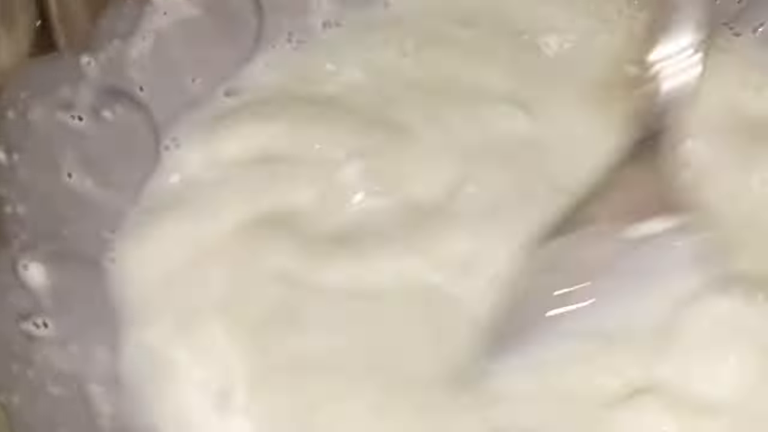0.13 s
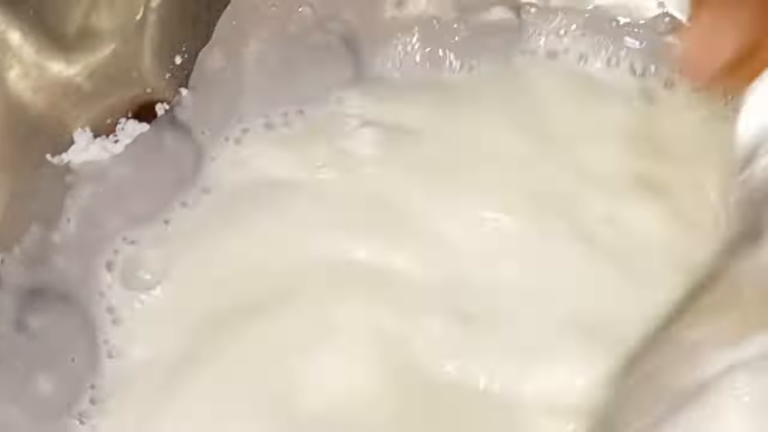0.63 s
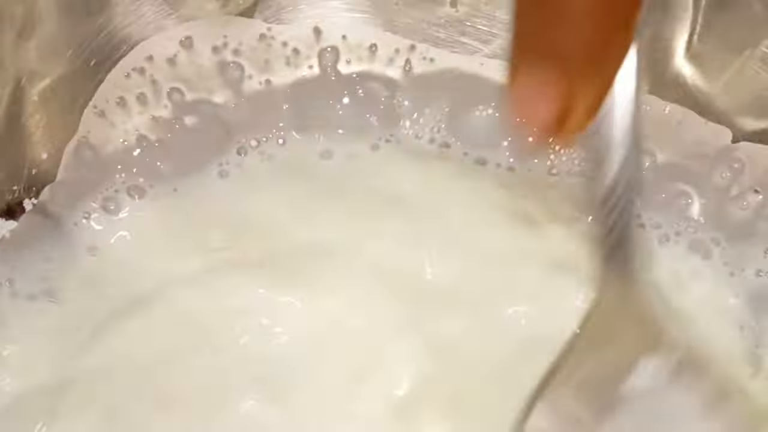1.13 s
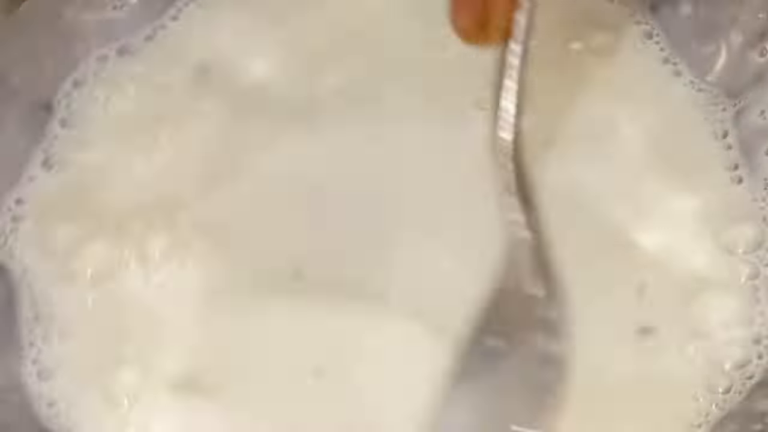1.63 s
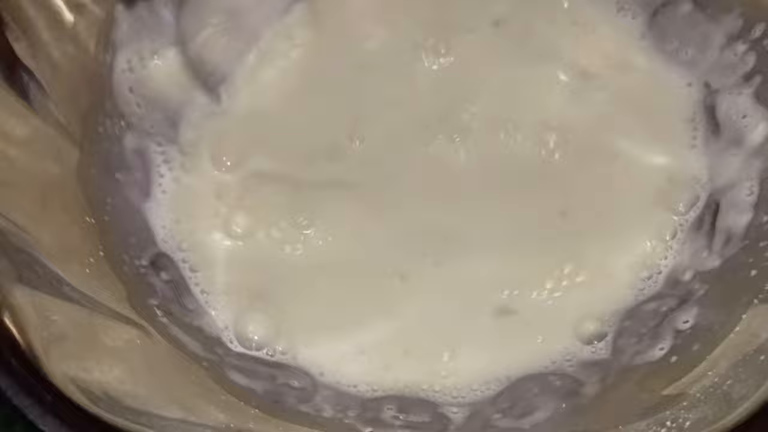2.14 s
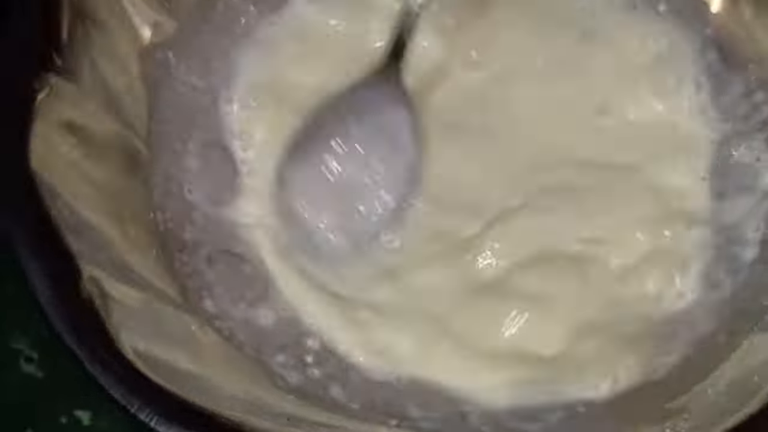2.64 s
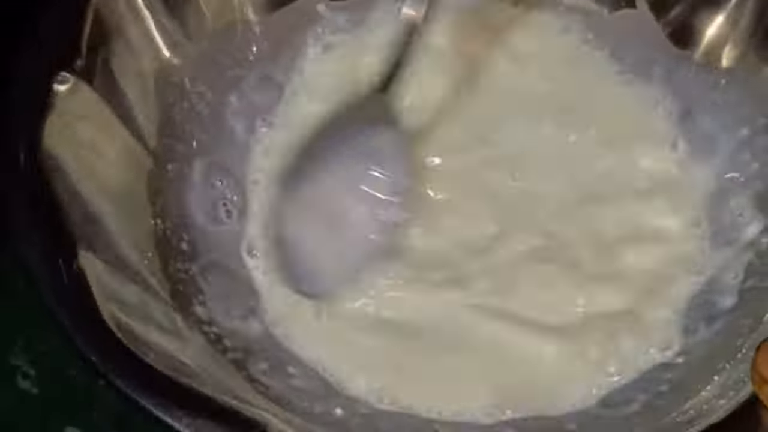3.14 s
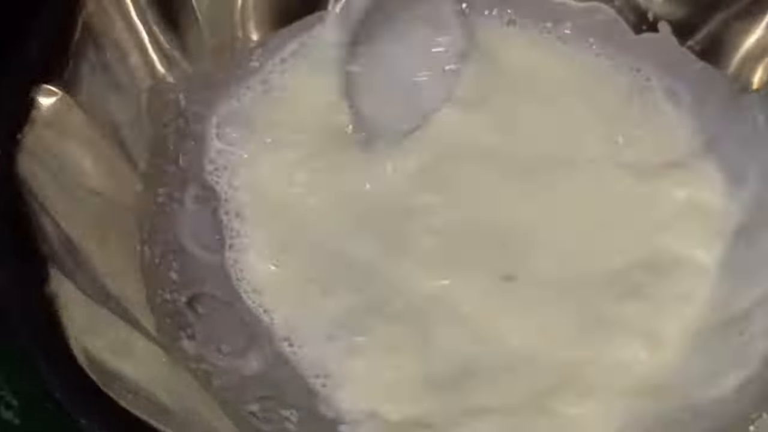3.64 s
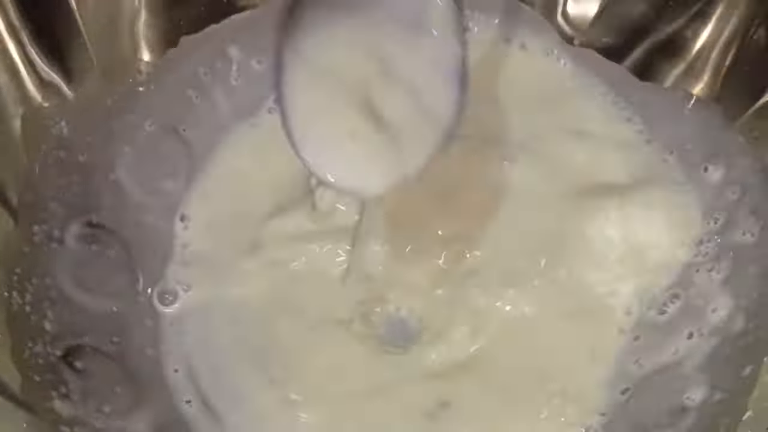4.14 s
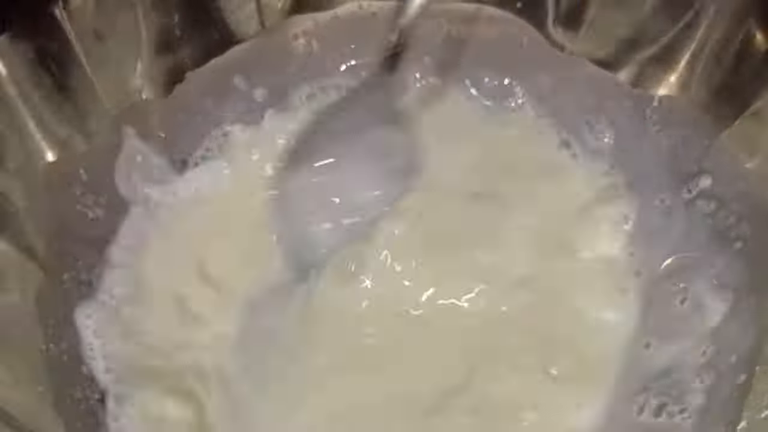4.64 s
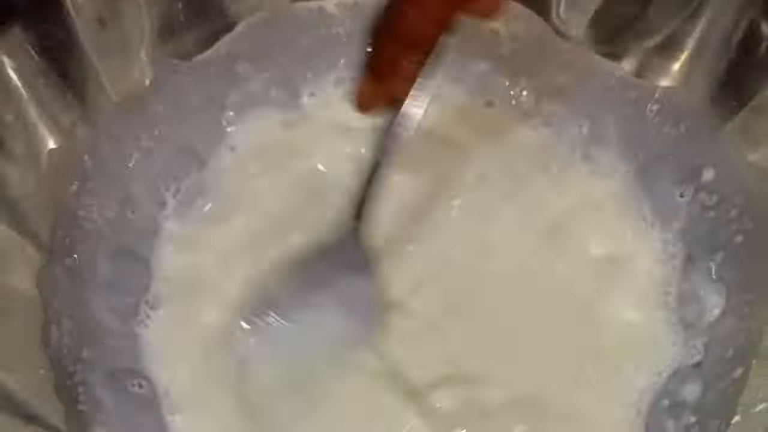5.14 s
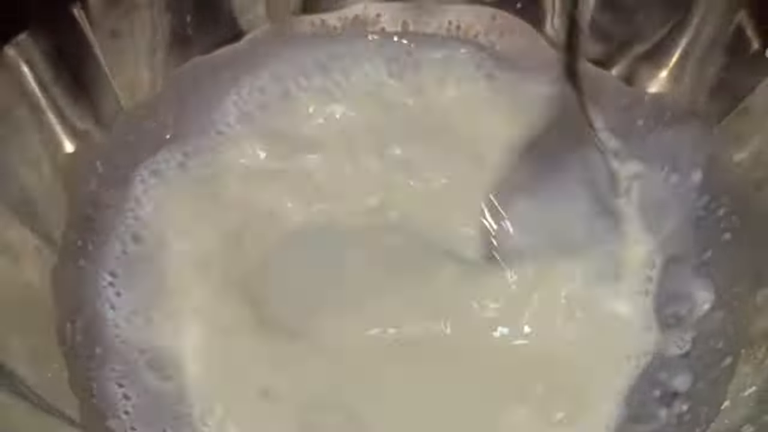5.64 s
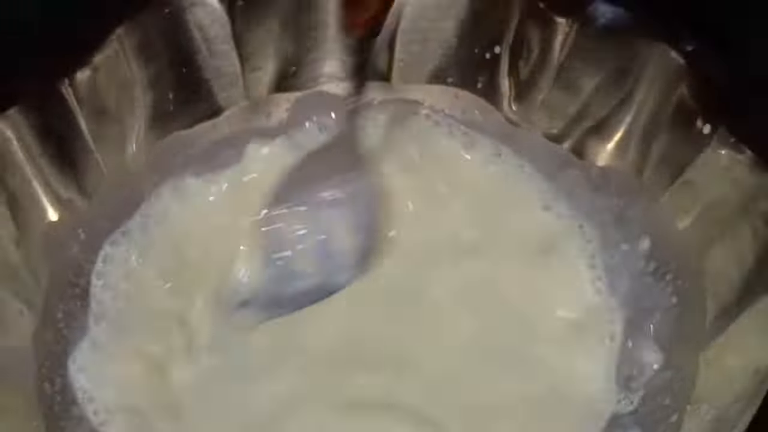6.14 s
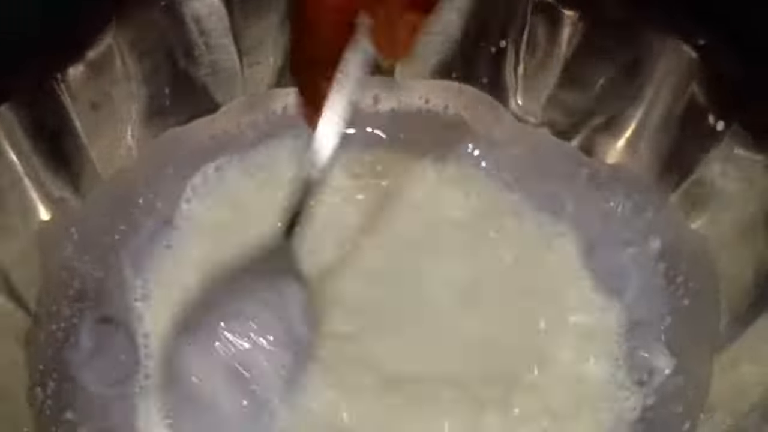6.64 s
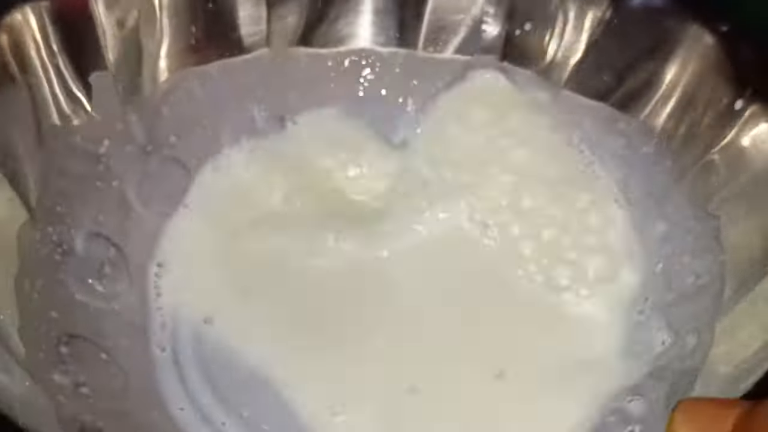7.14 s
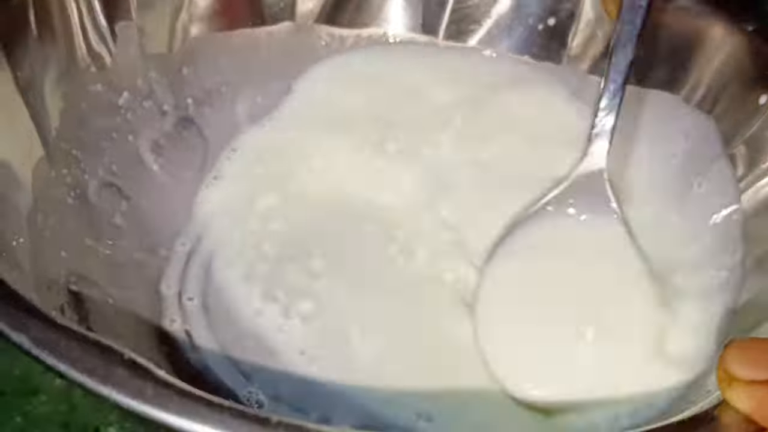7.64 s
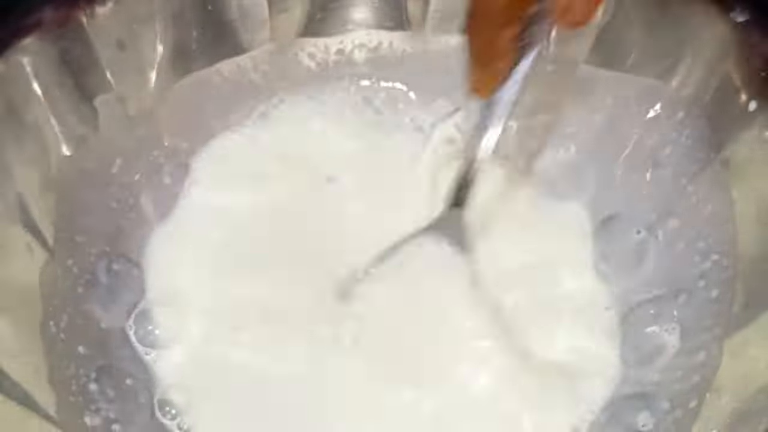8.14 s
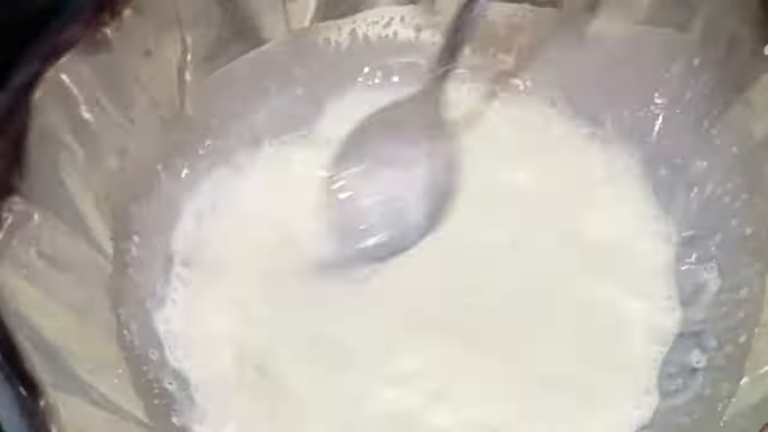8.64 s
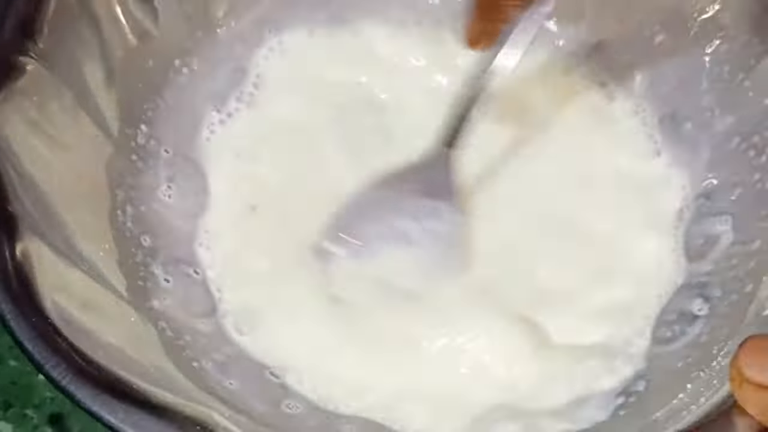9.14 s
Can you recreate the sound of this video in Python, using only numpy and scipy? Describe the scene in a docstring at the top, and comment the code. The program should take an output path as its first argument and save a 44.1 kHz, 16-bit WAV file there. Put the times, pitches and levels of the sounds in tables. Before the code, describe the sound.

Rapid jerky stirring of runny batter in a steel bowl: gritty rubbing, bright spoon knocks, dull bowl bumps, short gaps, quiet kitchen behind.

```python
"""On a kitchen counter a spoon stirs batter in a fluted steel bowl, heard close, in fast motion.
Only short snatches of the stirring are kept and butted together with cross-fades. In each, lumpy noise
with grains and blows excites the resonances of the wall: a thud, a ring, a rub and a wet-edge hiss.
Short decaying sines add slaps of batter, knocks of the spoon and shoves of the bowl on the counter.
Flutes of the wall make brief level jumps, and a faint noise floor fills the room."""
import sys
import numpy as np
from scipy import signal
from scipy.fft import rfft, irfft, next_fast_len
from scipy.io import wavfile
from scipy.ndimage import uniform_filter1d

SR = 44100
rng = np.random.default_rng(int(sys.argv[2]) if len(sys.argv) > 2 else 0)


def ratio_of_db(decibels):
    """Turn decibels (scalar or array-like) into linear amplitude factors; 0 dB maps to 1."""
    return 10 ** (np.asarray(decibels, float) / 20)


def dump(signal):
    """Clip the signal to [-1, 1] and save it as 16-bit WAV at the path in sys.argv[1]."""
    limited = np.clip(np.atleast_2d(signal).T, -1, 1)
    pcm = np.round(limited * 32767).astype(np.int16)
    wavfile.write(sys.argv[1], SR, pcm)


N = 408718
SIZE = 8192  # transform length [samples]
SNATCH_S, SHORTEST_S = .04199, .007  # pace of the steady cuts, least distance between cuts [s]

# resonances of bowl, spoon and counter, before scatter: (frequency [Hz], half-width [Hz],
# level over the broad colour [dB], gain per dB of wall ring [dB/dB])
BOWL_MODES = [(132.9, 21.7, 9, -2), (226, 42, 6.5, 0.2), (310.7, 21.5, 11.5, -0.6), (493, 68, 3.5, 0.54),
              (678.3, 16, 11.5, 0.6), (893.5, 61, 10.5, -0.12), (1210, 140, 1.5, 0.15),
              (1390, 33, 17, 0.53), (1493, 69, 13, 0.16), (2034, 250, 5.5, 0.18), (2703, 91, 6.5, 0.5),
              (3147, 83, 9.5, 0), (3660, 67, 7, 0.25), (5053, 81, 1.5, 1), (7074, 51, 6.5, 1.5),
              (8240, 81, 8, 0), (14340, 2700, 7, 0)]
# borders of the four bands thud | ring | rub | hiss: (frequency [Hz])
BAND_EDGES_HZ = (450, 1800, 5000)
# stereo balance over frequency: (frequency [Hz], left over right [dB])
STEREO_LEAN = [(60, 3), (130, 7.5), (290, 0), (640, 6), (1410, 1), (3100, -2), (6820, -1.5), (15000, -1)]
# blows of the spoon on the wall, each at the start of a snatch: (time [s], pitch of the struck patch [Hz],
# sharpness [dB], fall before rub sag and band share [dB/s])
KNOCKS_ON_WALL = [(0.376, 1370, 15, 327), (0.504, 1400, -2, 200), (1.175, 865, 17, 122),
                  (1.312, 906, 7, 100), (1.44, 319.9, -19, 350), (1.51, 1484, 5, 282),
                  (1.829, 1210, 11, 200), (1.865, 1210, 23, 200), (2.006, 1280, 13, 900),
                  (2.038, 1210, 15, 500), (2.086, 1199, 14, 600), (2.141, 1500, 15, 300),
                  (2.267, 1430, 5, 250), (2.649, 3214, 29, 398), (2.682, 2610, 10, 190),
                  (2.865, 1782, -7, 250), (3.015, 955, 3, 248), (3.323, 2830, 20, 196),
                  (3.797, 1374, -8, 190), (4.072, 1454, 10, 330), (4.314, 1500, -1, -6),
                  (4.453, 1510, 9, 120), (4.535, 1420, -5, 124), (6.888, 3547, 24, 250),
                  (6.927, 1500, 9, 150), (6.97, 1527, 6, 301.5), (7.008, 1508, 0, 100),
                  (7.427, 1020, 20, 301), (7.436, 716.9, 4, 245), (7.52, 2699, -5, -2),
                  (7.724, 1421, 0, 197), (7.793, 1390, 5, 206), (8.348, 1373, 15.5, 192)]
# spoon in touch with the steel, before scatter: (start [s], length [s], rub level [dB],
# wall ring over rub [dB], wet-edge hiss over rub [dB])
SPOON_CONTACTS = [(0.0, 0.039, -31.5, -0.5, -7.5), (0.046, 0.042, -34, -9, -2.5),
                  (0.082, 0.042, -43, -7, -3), (0.114, 0.075, -37, -3.5, -4.5),
                  (0.193, 0.051, -38.5, -6, -4), (0.248, 0.064, -36.5, 0.5, -6),
                  (0.313, 0.059, -37.5, -3, -0.5), (0.375, 0.042, -21.5, 1, -12),
                  (0.417, 0.045, -40.5, -5, -14), (0.464, 0.081, -37, -3, -2),
                  (0.539, 0.042, -41.5, 4, -3.5), (0.627, 0.044, -40.5, -3.5, -3),
                  (0.675, 0.082, -45, 0, -2), (0.75, 0.042, -35.5, -1.5, 0.5),
                  (0.789, 0.084, -40.5, 0, -3.5), (0.878, 0.042, -29, -5.5, -6),
                  (0.924, 0.042, -43, 1, -6.0), (0.966, 0.042, -38, -8, -3),
                  (1.01, 0.042, -33.5, -5.5, -2.5), (1.087, 0.084, -39, -8, -1.5),
                  (1.172, 0.043, -33, 5, -9.5), (1.219, 0.094, -31.5, -5.5, -3.5),
                  (1.309, 0.032, -38, 12, -9), (1.342, 0.042, -31, -4, -3), (1.38, 0.042, -37.5, -9.5, -4),
                  (1.423, 0.017, -28.5, -4, -6.5), (1.437, 0.028, -30.5, 4, -8.5),
                  (1.506, 0.044, -34.5, 14.5, -5.5), (1.547, 0.042, -43, 3, -2), (1.593, 0.043, -48, 5, 1),
                  (1.639, 0.042, -52, 1, -12), (1.676, 0.042, -49.5, 13, -13),
                  (1.712, 0.084, -41.5, -3.5, -7.5), (1.8, 0.022, -50.5, 1, -10),
                  (1.827, 0.024, -35, 18, -10), (1.847, 0.013, -40, -4, -5), (1.862, 0.025, -26, 1.5, -10),
                  (1.888, 0.045, -40, 0.5, -2.5), (2.003, 0.013, -23, 9.5, -12.5),
                  (2.015, 0.02, -45, 5.5, -2), (2.036, 0.018, -28, 2, -6), (2.054, 0.03, -36.5, -3.0, -4),
                  (2.085, 0.017, -15.5, 6.5, -9), (2.099, 0.038, -39, -1, -15.5),
                  (2.14, 0.037, -23, 8.5, -15.5), (2.265, 0.045, -28, 4, -19),
                  (2.307, 0.042, -28.5, -21, -7), (2.352, 0.044, -39, -1, -14), (2.391, 0.02, -54, 3, -5),
                  (2.414, 0.017, -36, -3, -7), (2.431, 0.048, -29, -21, -8),
                  (2.477, 0.042, -39.5, 7, -12.5), (2.519, 0.042, -49, 5.5, -10),
                  (2.554, 0.043, -33.5, -14, -10), (2.605, 0.049, -38, 2, -21),
                  (2.651, 0.03, -26, -24, -24), (2.681, 0.089, -27.5, -6.5, -14),
                  (2.766, 0.042, -37.5, -1.5, -18), (2.813, 0.042, -31, -14.5, -4.5),
                  (2.85, 0.014, -31.5, -0.5, -6), (2.866, 0.112, -28, -6, -12.5),
                  (2.981, 0.036, -32, -12.5, -3), (3.017, 0.048, -25, -9.5, -7.5),
                  (3.067, 0.043, -36.5, -4, -15), (3.109, 0.084, -30.5, -12.5, -9),
                  (3.187, 0.089, -35, -2, -14), (3.322, 0.034, -13, -3.5, -12),
                  (3.351, 0.056, -32, -4, -4.5), (3.414, 0.028, -31.5, 1.5, -11.5),
                  (3.437, 0.047, -41.5, 1.5, -19), (3.525, 0.043, -31.5, -1.5, -4.5),
                  (3.563, 0.043, -40, -7, -18), (3.65, 0.086, -31, 2.5, -15.5),
                  (3.731, 0.042, -41, 0.5, -14), (3.8, 0.021, -34, 4, -10.5), (3.86, 0.042, -47, -6, -14),
                  (3.942, 0.049, -42, 5, -16.5), (4.07, 0.041, -27.5, 3.5, -29.5),
                  (4.115, 0.042, -28, 4, -6.5), (4.153, 0.046, -41.5, 5, -1), (4.289, 0.023, -59.5, -6, -2),
                  (4.316, 0.012, -41, 2.5, -40), (4.365, 0.046, -41.5, 2.5, -6),
                  (4.452, 0.041, -48, 5.5, -24), (4.537, 0.041, -47.5, 2, -17),
                  (4.617, 0.083, -32.5, -1, -2.5), (4.7, 0.042, -41.5, -2, -10),
                  (4.743, 0.042, -49, -1.5, -3), (4.786, 0.086, -32.5, -6.5, -5),
                  (4.91, 0.084, -31, -7.5, -8.5), (4.998, 0.042, -37, -1, -13),
                  (5.041, 0.054, -28.5, -9, -9), (5.09, 0.033, -20.5, -7, -17), (5.123, 0.084, -30, 1, -14),
                  (5.204, 0.084, -29.5, -8, -7.5), (5.286, 0.042, -35, 4, -12),
                  (5.334, 0.084, -28, -6, -9.5), (5.416, 0.045, -38.5, -9, -9),
                  (5.461, 0.081, -30.5, -10.5, -9.5), (5.542, 0.043, -36.5, -3.5, -8),
                  (5.586, 0.042, -28.5, -12, -8.5), (5.626, 0.042, -22.5, -6, -15.5),
                  (5.669, 0.168, -30, -4.5, -8), (5.833, 0.042, -36, 7.5, -8.5),
                  (5.878, 0.083, -30, -9, -6.5), (5.959, 0.042, -30.5, 1, -13),
                  (6.003, 0.043, -34.5, -6.5, -5.5), (6.043, 0.126, -30.5, -10, -8.5),
                  (6.172, 0.042, -23, -7, -11), (6.209, 0.042, -34.5, -1, -6), (6.258, 0.042, -32, -8, -8),
                  (6.298, 0.126, -30.5, -3, -9), (6.427, 0.04, -30.5, -12, -9),
                  (6.464, 0.042, -25.5, -8, -8.5), (6.505, 0.043, -33.5, -2, -5),
                  (6.549, 0.042, -30, -10, -7.5), (6.592, 0.042, -25.5, -4.5, -8.5),
                  (6.632, 0.042, -36.5, -1, -7.5), (6.676, 0.084, -31.5, -11, -6),
                  (6.757, 0.042, -33, -2.5, -5.5), (6.883, 0.042, -25, 1, -9),
                  (6.924, 0.045, -23, 10.5, -6.5), (6.97, 0.038, -23, 13, -11.5),
                  (7.006, 0.05, -26, 8.5, -14.5), (7.053, 0.038, -43.5, 8, -24),
                  (7.176, 0.042, -62, -7, -3), (7.306, 0.037, -26.5, 4.5, -14),
                  (7.344, 0.042, -41, 3.5, -12), (7.388, 0.012, -54, 0, -21),
                  (7.398, 0.028, -50.5, -3, -20), (7.428, 0.008, -34.5, 4.5, -23),
                  (7.438, 0.04, -54.5, 17, -37), (7.475, 0.04, -65, 10, -22),
                  (7.52, 0.026, -56.5, -15, -25), (7.547, 0.012, -50.5, -23, 2.5),
                  (7.56, 0.042, -61, -4, -3), (7.722, 0.045, -26.5, 11.5, -11.5),
                  (7.766, 0.024, -32.5, 3, -7), (7.794, 0.057, -31, 12.5, -17),
                  (7.846, 0.047, -41, 10, -22), (8.022, 0.039, -38.5, -4, -14.5),
                  (8.059, 0.042, -33.5, -9.5, -13), (8.102, 0.014, -50, 9, -16),
                  (8.112, 0.032, -39.5, -18, -19), (8.147, 0.042, -54, 5, -20),
                  (8.183, 0.039, -54, -10, -18), (8.227, 0.042, -61, -8, -3), (8.315, 0.035, -54.5, -4, -1),
                  (8.344, 0.012, -16, -5.5, -10.5), (8.361, 0.037, -30, -1, -8),
                  (8.44, 0.166, -32, -12, -7.5), (8.606, 0.084, -29, -10, -10),
                  (8.691, 0.042, -40, -7, -2.5), (8.732, 0.042, -36, -12, -4),
                  (8.774, 0.084, -37.5, -14, -3), (8.859, 0.126, -35, -9, -4),
                  (8.982, 0.084, -34.5, -9, -3.5), (9.067, 0.042, -30.5, -10, -3.5),
                  (9.105, 0.084, -33.5, -9.5, -8), (9.193, 0.042, -26.5, -9.5, -10.5),
                  (9.239, 0.034, -34, -10, -7)]


def at_time(points, s):
    """Linear interpolation of a slowly varying quantity at one time."""
    return np.interp(s, *np.transpose(points))


def read(points, hz):
    """Linear interpolation of a spectrum on a log-frequency axis."""
    f, value = np.transpose(points)
    return np.interp(np.log(hz + 1), np.log(f + 1), value)


def wander(shape, span):
    """Twice-averaged Gaussian noise: a smooth random curve of rms 1 along the last axis."""
    smooth = uniform_filter1d(uniform_filter1d(rng.standard_normal(shape), span), span)
    return smooth / smooth.std()


def kitchen():
    """Diffuse room rumble: stationary filtered noise, independent at the two ports."""
    # spectrum of the room tone: (frequency [Hz], relative level [dB])
    room_colour = [(40, -1), (330, -5.5), (700, -26), (4000, -33.5)]
    room_db = -65
    size = next_fast_len(N)
    colour = ratio_of_db(read(room_colour, np.fft.rfftfreq(size, 1 / SR)))
    spectrum = rfft(rng.standard_normal((2, size))) * colour
    tone = irfft(spectrum, size)[:, :N]
    return ratio_of_db(room_db) * tone / tone.std()


def flutes():
    """Amplitude modulation: as the spoon edge trips over a flute, the level jumps briefly."""
    # (time [s], jump of level [dB], a dip if negative)
    flute_jumps = [(0.256, 6), (0.468, 5), (0.508, 5), (1.761, 10.5), (2.388, 7.5), (2.43, -0.5),
                   (2.573, 0), (2.781, 4), (2.904, 9), (3.038, -1), (3.163, 8.5), (3.266, 11.5),
                   (3.418, 5.5), (3.475, 11.5), (3.955, 7), (4.404, 0.5), (4.858, 6), (4.985, 9),
                   (5.105, 2), (5.118, 2), (5.33, 3.5), (5.525, 7.5), (5.704, -7), (5.921, 2.5), (5.996, 6),
                   (6.077, 8.5), (6.277, 6), (6.334, 7.5), (6.47, 2), (6.751, 5), (6.934, 2.5),
                   (6.976, -0.5), (7.015, 1.5), (7.732, 2), (7.762, 4.5), (7.824, 2.5), (8.121, 7),
                   (8.168, 8), (8.495, 6), (8.54, 5.5), (8.654, 6.5), (8.668, 3.5), (8.751, 8),
                   (8.935, 8.5), (9.017, 5), (9.077, 5.5), (9.159, 3), (9.212, 4)]
    rise_s, fall_s = 0.0024, 0.0077  # scales of the two Gaussian flanks
    t, jump_db = np.arange(N) / SR, np.zeros(N)
    for s, db in flute_jumps:
        near = slice(max(round((s - .05) * SR), 0), round((s + .05) * SR))
        late = t[near] - s
        jump_db[near] += db * np.exp(-(late / np.where(late < 0, rise_s, fall_s)) ** 2)
    return ratio_of_db(jump_db)


def ping(t, hz, dying_s, bend=0, rise_s=0.0017, apart_rad=1.3):
    """A damped oscillator: a sine that swells, bends and dies, with its own phase at each port."""
    late = np.maximum(t, 0)
    halves = np.array([[.5], [-.5]])  # left and right
    apart = apart_rad * min(hz / 700, 1) ** 2 * rng.standard_normal()
    phase = 2 * np.pi * rng.random() + apart * halves
    balance = ratio_of_db(read(STEREO_LEAN, hz) * halves)
    turns = hz * late * (1 + bend * late / dying_s / 2)
    envelope = (1 - np.exp(-late / rise_s)) * np.exp(-late / dying_s)
    return balance * envelope * np.sin(2 * np.pi * turns + phase)


def batter_slaps(t, band_db, ring_db, fall_db):
    """Impulsive excitation: batter slaps the wall and sounds short notes near its modes."""
    slaps_per_snatch = 3
    slap_db, range_db, cycles, bend = -1.5, 6, 12, .04
    db_per_ring = -0.12  # a freely ringing wall carries little batter
    out = 0
    for place, pick, detune, size in rng.random((slaps_per_snatch, 4)):
        hz = BOWL_MODES[1 + int(pick * 12)][0] * (.92 + .16 * detune)
        late = place * SNATCH_S
        db = band_db[np.searchsorted(BAND_EDGES_HZ, hz)] + slap_db + range_db * (2 * size - 0.5)
        db += db_per_ring * max(ring_db, 0) - fall_db * min(late / t[-1], 1)
        dying_s = np.clip(cycles / hz, .003, .012)
        out = out + ratio_of_db(db) * ping(t - late, hz, dying_s, bend=bend * rng.standard_normal())
    return out


def shove_note(t, hz, thud_db):
    """Low-mode resonance: a shove on the counter rings one low note clean."""
    over_thud_db, dying_s = 3.5, 0.033
    return ratio_of_db(thud_db + over_thud_db) * ping(t, hz, dying_s, rise_s=0.0051)


def knock_notes(t, struck_hz, blow_db, band_db):
    """Free vibration after impact: the struck patch and the spoon itself ring clean."""
    patch_db, patch_s = -5.5, 0.01  # level over its band, dying time
    spoon_hz, spoon_db, spoon_s = 3310, -2, 0.0074  # level over the rub
    lift_db = 0.38 * min(blow_db, 15)  # a sharper blow rings both louder
    patch_db += band_db[np.searchsorted(BAND_EDGES_HZ, struck_hz)] + lift_db
    patch = ratio_of_db(patch_db) * ping(t, struck_hz, patch_s, apart_rad=.7)
    return patch + ratio_of_db(spoon_db + lift_db) * ping(t, spoon_hz, spoon_s, apart_rad=.7)


def grit(struck, blow_db, lumpy_db=1.4, grain_db=3.5, grains_per_s=600, blow_s=0.00097):
    """Sliding friction: lumpy noise with grains caught by the spoon edge; a blow is an initial burst."""
    a, b, draw = rng.standard_normal(SIZE), rng.standard_normal(SIZE), rng.random(SIZE)
    grain_size = ratio_of_db(9.0 + grain_db * np.minimum(rng.exponential(1, SIZE), 4))
    grains = (draw < grains_per_s / SR) * grain_size * np.sign(a)
    blow = 1 + struck * ratio_of_db(blow_db) * np.exp(-np.arange(SIZE) / (blow_s * SR))
    shared_and_apart = np.array([a + grains, 0.82 * b])
    return shared_and_apart * ratio_of_db(lumpy_db * wander(SIZE, 90)) * blow


def causal(gain):
    """Minimum phase by the folded cepstrum: a body rings only after it is struck."""
    cepstrum = irfft(np.log(gain + 1e-7))
    cepstrum[..., 1:SIZE // 2] *= 2
    cepstrum[..., SIZE // 2 + 1:] = 0
    return np.exp(rfft(cepstrum))


def bowl(hz, s, ring_db, thud_db, struck_hz, shift=0.018, uneven_db=5.0, struck_db=24, struck_width=70,
         others_db=-4):
    """Modal response: resonances move and change strength with the place of spoon and batter."""
    # broad colour of steel and microphone: (frequency [Hz], relative level [dB])
    steel_colour = [(15, -66), (25, -20), (130, -2.5), (307, 0), (420, -2), (603, -10), (671, -6.5),
                    (1060, -5.5), (1470, -5.5), (1730, -8), (3210, -2), (6830, -21), (8940, -33.5),
                    (14500, -31), (15800, -46)]
    # bowl rocking while the spoon pushes along the bottom: (time [s], lift of the lowest notes [dB])
    rocking_lift = [(0, 4.5), (2.2, 6), (2.6, -8), (4.5, -16), (4.8, 4.5), (5.6, 1), (6.0, -9.5),
                    (6.9, -18), (7.9, -12), (8.4, -2), (9.3, -8)]
    # a narrow notch near 9 kHz, a wide one near 11.3 kHz: (frequency [Hz], width [Hz], depth [0-1])
    treble_notches = [(9050, 400, 0.5), (11290, 980, 0.75)]
    power = np.ones(len(hz))
    scatter = rng.standard_normal((len(BOWL_MODES), 2))
    for (mode_hz, width, db, per_ring), (a, b) in zip(BOWL_MODES, scatter):
        # a blow in the ring band leaves the other modes there weaker
        yielding = (450 < struck_hz < 1800) * (450 < mode_hz < 1800)
        # random mode gain, limited so that no single mode booms
        top = ratio_of_db(db + per_ring * ring_db + others_db * yielding + uneven_db * np.clip(b, -2, 1))
        spread = shift * (1 + mode_hz / 1500 * (mode_hz > 1800))  # upper modes move most
        moved_hz = mode_hz * (1 + spread * a)
        power = power + top ** 2 / (1 + ((hz - moved_hz) / width) ** 2) ** 2
    if struck_hz:
        power = power + ratio_of_db(struck_db) ** 2 / (1 + (2 * (hz - struck_hz) / struck_width) ** 2)
    rocking_db = at_time(rocking_lift, s) / (1 + (hz / 165) ** 8)
    # the lower wall modes go with the thud
    belly_db = 0.44 * (thud_db - ring_db - 0.5) / (1 + (hz / 1050) ** 10)
    notched = 1
    for notch_hz, width, depth in treble_notches:
        notched = notched * (1 - depth / (1 + (2 * (hz - notch_hz) / width) ** 2))
    colour_db = read(steel_colour, hz) + rocking_db + belly_db + 2.5 * wander(len(hz), 40)
    return causal(np.sqrt(power) * notched * ratio_of_db(colour_db))


def ports(shared, apart, hz, s):
    """Partial coherence: the wall reaches two microphone ports with unlike phase and balance."""
    # (frequency [Hz], left-right likeness [0-1], scatter of phase [rad])
    port_likeness = [(59.5, 0.96, 0.17), (294.4, 1, 0.21), (714, 0.8, 1.06), (1500, 0.86, 1.74),
                     (3350, 0.63, 2.96), (6460, 0.95, 0.83), (9000, 0.85, 0.32), (15000, 1, 1.1)]
    # the bowl is nearer the left port: (time [s], lead of the left [samples])
    left_lead = [(0, 22), (2.2, 22), (2.4, 8)]
    # the bowl drifts before the microphone: (time [s], left over right added to the lean [dB])
    drift_balance = [(0.0, -0.5), (1.73, 1), (2.55, -2.5), (6.3, -1), (7.0, -1.5), (8.2, -2), (8.5, -1.5),
                     (9.26, -2)]
    f, likeness, scatter = np.transpose(port_likeness)
    near = np.clip(np.interp(hz, f, likeness), 0, 1)
    lead = 2 * np.pi * np.minimum(hz, 4200) * at_time(left_lead, s) / SR * (hz < 5000)
    phase = lead + np.interp(hz, f, scatter) * wander(len(hz), 30)
    tilt_db = read(STEREO_LEAN, hz) + at_time(drift_balance, s) + 2 * wander(len(hz), 30)
    side = ratio_of_db(tilt_db / 2) * np.exp(.5j * phase)
    return np.array([shared * side, (near * shared + np.sqrt(1 - near ** 2) * apart) / side])


def loudness(pair, centre=0.37):
    """Energy average of what the two ports share and what each has alone."""
    return np.sqrt(centre * np.mean(pair.sum(0) ** 2) / 2 + (1 - centre) * np.mean(pair ** 2))


def snatch(row, length, fade, shoved_hz, struck_hz, blow_db, drift_s=0.037, noisy_thud_db=-5):
    """Source and filter: grit through the bowl, its four bands set to their levels, plus clean notes."""
    # share of the fall in each band, thud to hiss: (share [0-1])
    fall_share = (0.86, 0.92, 0.58, 0.62)
    s, rub_db, hiss_db, ring_db, thud_db, fall_db = row
    band_db = (thud_db, ring_db, 0, hiss_db)  # over the rub
    size = length + fade
    hz = np.fft.rfftfreq(SIZE, 1 / SR)
    # two patches of wall, only the first with the blow; the struck resonance is in both
    patches = []
    for struck in (struck_hz > 0, False):
        source = ports(*rfft(grit(struck, blow_db)), hz, s)
        patches.append(source * bowl(hz, s, ring_db, thud_db, struck_hz))
    patches = np.array(patches)
    # the spoon travels from one patch to the next, so the colour drifts
    travel = np.pi / 2 * np.clip(np.arange(size) / (drift_s * SR) - .5, 0, 1)
    low_passes = [1 / (1 + (hz / edge_hz) ** 10) for edge_hz in BAND_EDGES_HZ]
    below = [0 * hz, *low_passes, 1 + 0 * hz]
    along = np.arange(size) / length
    out = 0
    for k, over_db in enumerate(band_db):
        here, there = irfft(patches * (below[k + 1] - below[k]))[..., :size]
        part = here * np.cos(travel) + there * np.sin(travel)
        part = part * ratio_of_db(-fall_db * fall_share[k] * along)
        if shoved_hz and k == 0:
            over_db = over_db + noisy_thud_db  # the clean note takes the place of some noise
        out = out + ratio_of_db(rub_db + over_db) * part / loudness(part[:, :length])
    t = np.arange(size) / SR
    notes = batter_slaps(t, band_db, ring_db, fall_db)
    if shoved_hz:
        notes = notes + shove_note(t, shoved_hz, thud_db)
    if struck_hz:
        notes = notes + knock_notes(t, struck_hz, blow_db, band_db)
    return out + ratio_of_db(rub_db) * notes


def cuts():
    """Segmentation: snatches start at blows, at changes of contact and at a steady pace between."""
    first_cut_s, blow_hold_s = .0392, .016  # no steady cut falls this soon after a blow
    start, length = np.transpose(SPOON_CONTACTS)[:2]
    blows = np.transpose(KNOCKS_ON_WALL)[0]
    steady = np.arange(first_cut_s, N / SR, SNATCH_S)
    steady = [s for s in steady if not np.any((blows < s) & (s < blows + blow_hold_s))]
    kept = [0, N / SR]
    for s in (*blows, *start, *(start + length), *steady):
        if 0 < s < N / SR and np.min(abs(np.array(kept) - s)) > SHORTEST_S:
            kept.append(s)
    return np.sort(kept)


def levels(s, end, dying, shove_db, chance):
    """Forced and free vibration: contact sets the levels; once the spoon lifts, the bowl rings down."""
    # how hard the spoon bears down on the bottom: (time [s], lift of the thud [dB])
    bearing_lift = [(0, -1), (1.1, 1), (2.0, 1.5), (2.7, -3), (3.3, -2), (4.0, -5), (4.6, -4.5), (5.6, -1),
                    (6.8, 1), (6.95, -3.5), (7.7, 1.5), (7.9, -7), (8.03, -25.5), (8.25, 1.5), (8.4, 1),
                    (9.27, -0.5)]
    # snatch-to-snatch standard deviation: (thud [dB], ring [dB], rub [dB], hiss [dB])
    chance_spread = (2.6, 0.31, 1.09, 0.23)
    loud_rub_db = -21  # rub level above which the snatch sags faster
    lift_drop_db, lift_fall_db_per_s, lift_from_db, quiet_db = -12, 168.5, -34.5, -73.5
    middle = (s + end) / 2
    k = max(np.searchsorted(np.transpose(SPOON_CONTACTS)[0], middle) - 1, 0)  # this contact or the last
    start, length, rub_db, ring_db, hiss_db = SPOON_CONTACTS[k]
    leaves = start + length
    struck = dying is not None
    lifted_s = middle - leaves
    if lifted_s > 0:
        lifted_db = min(rub_db, lift_from_db) + lift_drop_db - lift_fall_db_per_s * lifted_s
        rub_db = max(lifted_db, quiet_db)
        hiss_db, ring_db, thud_db = -13, 1.5, 2.5  # duller than in contact
        fall = lift_fall_db_per_s
    else:
        thud_db = -6.5 + 0.55 * ring_db - 0.083 * (rub_db - loud_rub_db)
        thud_db += at_time(bearing_lift, s)
        thud_db += -1.5 * struck  # a blow on the wall hardly moves the bowl
        fall = dying if struck else 94.5  # dB per s
        fall += 7.7 * max(rub_db - loud_rub_db, 0)
        last = k + 1 == len(SPOON_CONTACTS)
        if not last and leaves - SHORTEST_S < end < SPOON_CONTACTS[k + 1][0] - 2 * SHORTEST_S:
            fall += 114  # extra sag as the spoon leaves the steel
        if k and not struck and sum(SPOON_CONTACTS[k - 1][:2]) + 2 * SHORTEST_S < s < start + SHORTEST_S:
            fall += -110  # slower sag or a swell as it lands without a blow
    if shove_db:
        thud_db = shove_db - rub_db
    thud, ring, rub, hiss = chance * chance_spread
    return s, rub_db + rub, hiss_db + hiss, ring_db + ring, thud_db + thud, fall * (end - s)


def carry_modes(mix):
    """Narrow-band resonance: the strongest modes ring on through the joins of the snatches."""
    # (frequency [Hz], width [Hz], level of the added resonance at its peak [dB])
    carried_modes = [(128.5, 3.3, -9), (315, 13, -7), (683, 6.1, -11), (1527, 15, -3)]
    for hz, width, db in carried_modes:
        mix = mix + ratio_of_db(db) * signal.lfilter(*signal.iirpeak(hz, hz / width, SR), mix)
    return mix


def scene(splice_s=0.0039):
    """Superposition: snatches joined by equal-power cross-fades, flute jumps and the room tone."""
    # the spoon turns round and shoves the bowl on the counter, for one snatch:
    # (time [s], thud level before scatter [dB], pitch of the thud [Hz])
    counter_shoves = [(0, -28.5, 125), (0.039, -38, 265), (0.123, -30, 135), (0.249, -33.5, 154),
                      (0.312, -26.5, 262), (0.501, -36, 138), (0.543, -41, 295), (0.753, -35, 172),
                      (0.837, -39, 101.8), (0.879, -25, 163), (0.921, -41, 293), (1.005, -36, 101.9),
                      (1.172, -27.5, 312.5), (1.309, -30, 290), (1.44, -21.5, 319), (1.507, -21, 282),
                      (1.677, -40, 256), (1.825, -26, 236.5), (2.393, -37, 298), (2.474, -35.5, 279),
                      (2.516, -34, 293), (2.558, -37.5, 322.5), (3.189, -32, 277.5), (3.322, -30.5, 226.3),
                      (3.649, -27, 360), (3.797, -31.5, 226), (3.942, -35.5, 192.8), (4.113, -25, 328),
                      (4.155, -34, 300.9), (4.364, -39.5, 343.4), (4.742, -36.5, 266), (4.87, -40, 295.5),
                      (4.994, -32, 294), (5.12, -28, 316), (5.288, -31.5, 285), (5.834, -31.5, 305.9),
                      (5.959, -31.5, 285), (6.212, -31.5, 301), (6.632, -35, 312), (6.758, -28.5, 299),
                      (6.8, -43.0, 308), (7.052, -35, 354.5), (8.689, -32.5, 239), (8.941, -35, 137),
                      (8.983, -37.5, 285), (9.235, -42, 321.4)]
    fade = round(splice_s * SR)
    ramp = np.sin(np.linspace(0, np.pi / 2, fade))
    times = cuts()
    struck, dying, shove_db, shove_hz = {}, {}, {}, {}
    for s, hz, db, fall in KNOCKS_ON_WALL:
        k = np.argmin(abs(times - s))
        struck[k], dying[k] = (hz, db), fall
    for s, db, hz in counter_shoves:
        k = np.argmin(abs(times - s))
        shove_db[k], shove_hz[k] = db, hz
    chance = rng.standard_normal((len(times), 4))
    starts = np.round(times * SR).astype(int)
    mix = np.zeros((2, N + fade))
    for k, (start, end) in enumerate(zip(starts, starts[1:])):
        row = levels(times[k], times[k + 1], dying.get(k), shove_db.get(k), chance[k])
        window = np.concatenate([ramp, np.ones(end - start - fade), ramp[::-1]])
        piece = snatch(row, end - start, fade, shove_hz.get(k, 0), *struck.get(k, (0, 0)))
        mix[:, start:end + fade] += window * piece
    mix = carry_modes(mix)
    # high-pass at 85 Hz: takes out low splatter from the joins of the snatches
    mix = signal.sosfilt(signal.butter(2, 85, "high", fs=SR, output="sos"), mix)
    return mix[:, fade // 2:][:, :N] * flutes() + kitchen()


def roll_off(x):
    """The treble ends steeply here."""
    return signal.sosfilt(signal.butter(12, 15910, fs=SR, output="sos"), x)


def record(dry):
    """Band limitation by a linear-phase low-pass, then overload by clipping at full scale."""
    low_pass = signal.firwin(401, 15650, window=("kaiser", 9), fs=SR)
    limited = signal.oaconvolve(dry, low_pass[None], "same")
    return roll_off(np.clip(limited, -1, 1))


dry = scene()
out = record(dry)
dump(out)
```